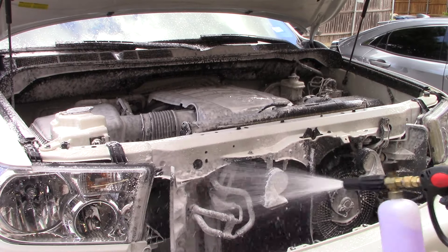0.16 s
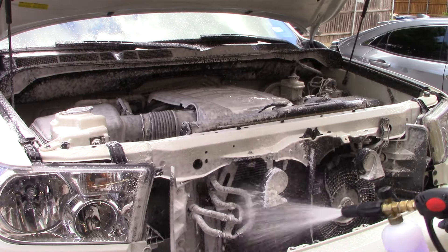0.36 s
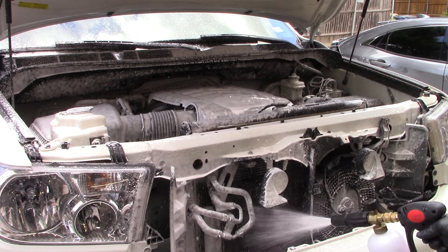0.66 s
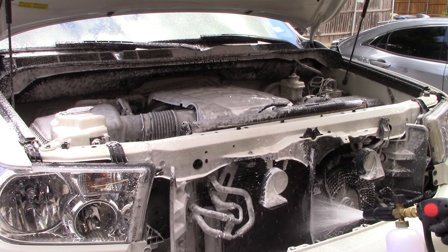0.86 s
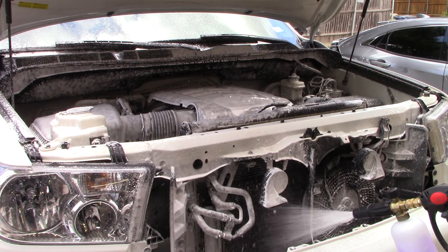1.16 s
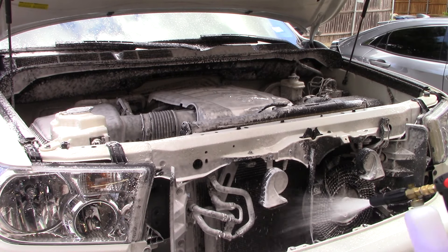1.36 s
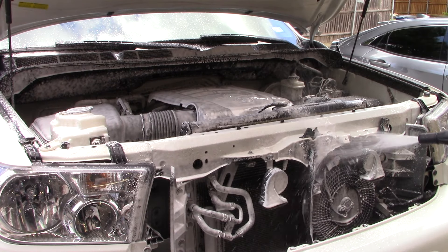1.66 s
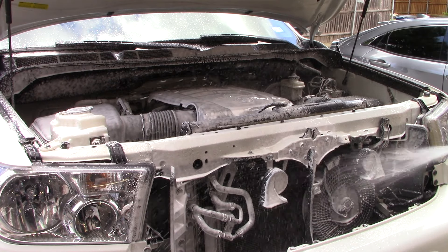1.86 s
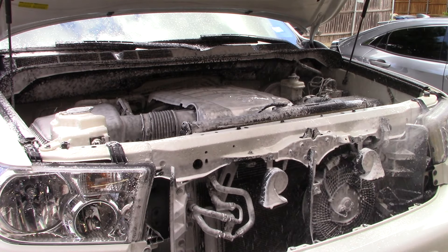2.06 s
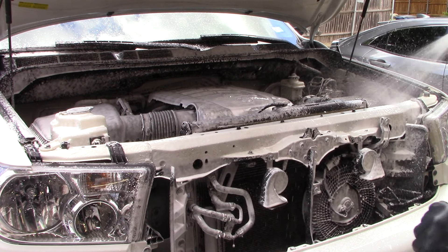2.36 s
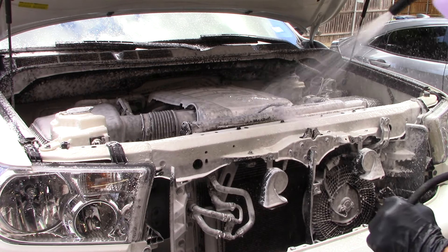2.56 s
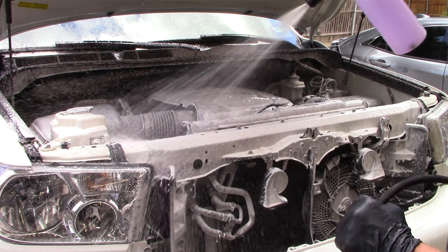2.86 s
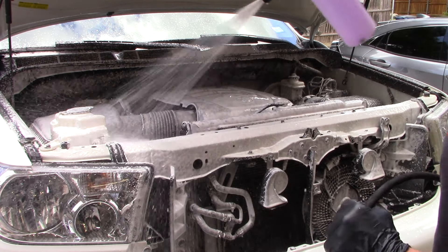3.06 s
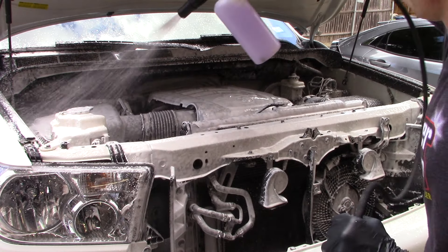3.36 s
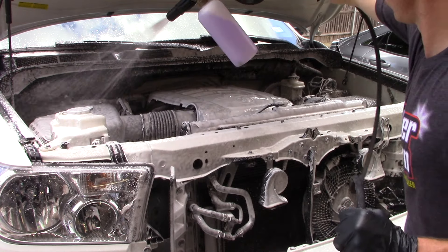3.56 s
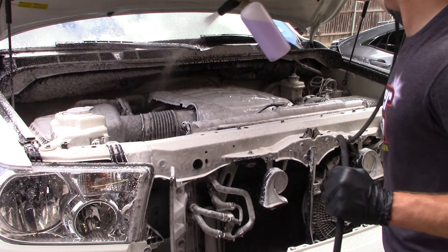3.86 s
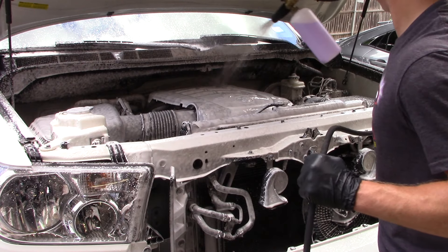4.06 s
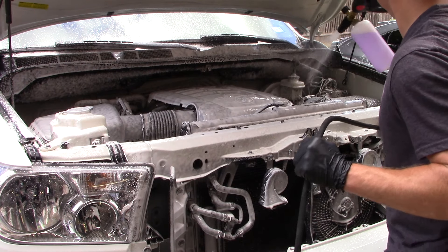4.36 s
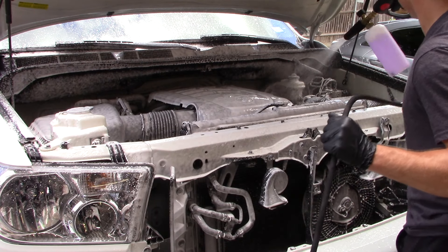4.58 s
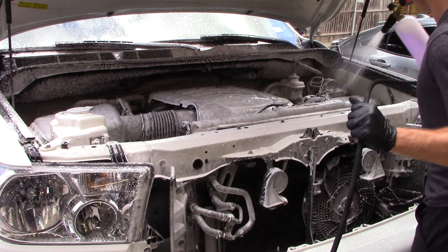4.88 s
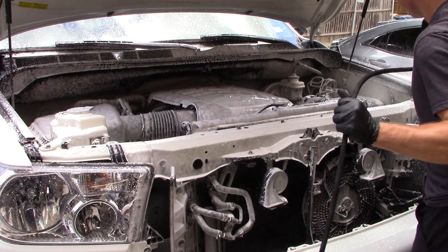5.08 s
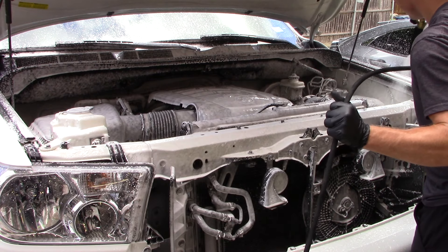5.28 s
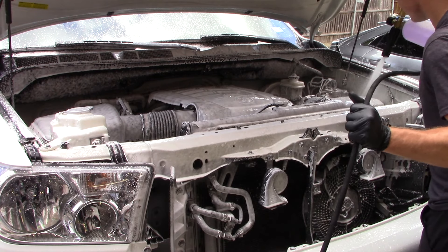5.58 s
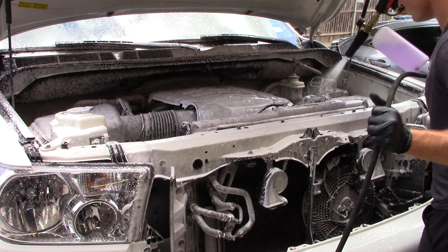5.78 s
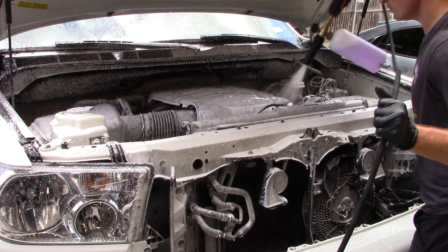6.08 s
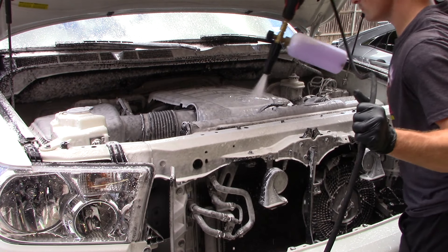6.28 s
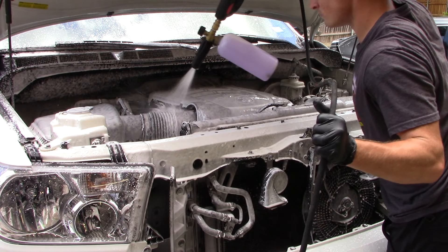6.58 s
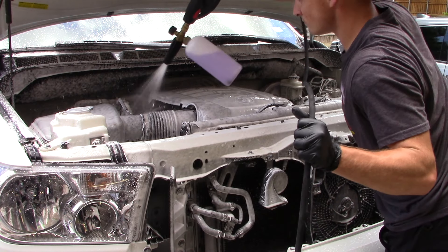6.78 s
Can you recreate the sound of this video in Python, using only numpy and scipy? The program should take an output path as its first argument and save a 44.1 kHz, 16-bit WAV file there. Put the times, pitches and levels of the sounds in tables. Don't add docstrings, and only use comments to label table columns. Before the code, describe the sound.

Loud continuous wet hiss and airy roar of a foam sprayer sweeping an open engine bay, with a motor pump droning steadily underneath.

```python
import sys
import numpy as np
from scipy import signal
from scipy.fft import rfft, irfft
from scipy.io import wavfile
from scipy.ndimage import uniform_filter1d, map_coordinates

SR = 44100
rng = np.random.default_rng(int(sys.argv[2]) if len(sys.argv) > 2 else 0)


def volts_from_db(level):
    exponent = np.asarray(level, float) / 20
    return 10 ** exponent


def transcribe(u):
    v = np.clip(np.atleast_2d(u).T, -1, 1)
    q = np.round(v * 32767).astype(np.int16)
    wavfile.write(sys.argv[1], SR, q)


N = 305613
HOP, SIZE = 128, 512

# t/s, splash level/dB, mist level/dB, splash centre f/Hz
SPRAY_PATH = [(0, -20.5, -23, 5800), (.6, -21.5, -29.5, 6250), (1.4, -20.5, -28.5, 6230),
              (1.7, -19, -26, 6260), (2.1, -19, -23, 6200), (2.5, -22, -23, 5370), (2.75, -20, -21, 5900),
              (3.3, -20, -26.5, 5370), (3.67, -22.5, -26.5, 5100), (4.2, -21.5, -23.5, 5170),
              (4.7, -22.5, -24, 5000), (5.15, -23.5, -24.5, 5470), (5.62, -21, -26, 5800),
              (5.85, -20.5, -24.5, 5300), (6.2, -17.5, -21.5, 5400), (6.55, -21, -25.5, 5500),
              (6.93, -21, -23.5, 5000)]
# t/s, swell level/dB, half length/s
MIST_GLINTS = [(.04, 0, 0.074), (.25, 5, 0.036), (.4, 1.5, .04), (.5, 6, 0.061), (.79, 5.5, 0.057),
               (.91, 4, 0.022), (1.01, 3, 0.045), (1.16, 3, 0.016), (1.3, 5, 0.039), (1.58, 5.5, 0.01),
               (1.69, 6, 0.091), (1.97, 4.5, .08), (2.26, 3, 0.032), (2.52, 2, .05), (3.03, 4.5, .06),
               (3.28, 4.5, 0.041), (3.42, 0.5, .05), (3.76, 2, .04), (3.97, 3.5, 0.18), (4.45, 1.5, 0.086),
               (4.8, 3, 0.12), (5.12, 2.5, 0.064), (5.4, 3, .11), (5.76, 2.5, .05), (6.0, 2, 0.036),
               (6.62, 4.5, 0.038), (6.77, 5, 0.082), (6.93, 1, .03)]


def unit(x):
    return x / np.sqrt(np.mean(np.abs(x) ** 2) + 1e-20)


def along(points, hz):
    f, v = np.transpose(points)
    return np.interp(np.log(hz + 1), np.log(f + 1), v, -120, -120)


def curves(rows, step=1):
    s, *cols = np.transpose(rows)
    now = np.arange(0, N + SIZE, step) / SR
    return [np.interp(now, s, c)[:N] for c in cols]


def swells(rows, step=1):
    coarse = np.arange(0, N + SIZE, 64) / SR
    total = sum(db * np.exp(-((coarse - s) / half_s) ** 2) for s, db, half_s in rows)
    return np.interp(np.arange(0, N + SIZE, step) / SR, coarse, total)[:N]


def wobble(rate):
    coarse = np.arange(0, N + 32, 32)
    knots = rng.standard_normal(int(N * rate / SR) + 4)
    return np.interp(np.arange(N), coarse, map_coordinates(knots, [coarse * rate / SR]))


def shaped(x, gain, patchy_db, patch_hz, patch_s):
    hz, t, z = signal.stft(x, SR, nperseg=SIZE, noverlap=SIZE - HOP)
    patches = rng.standard_normal(z.shape)
    for _ in range(2):
        patches = uniform_filter1d(patches, 1 + int(patch_hz * SIZE / SR), axis=0)
        patches = uniform_filter1d(patches, 1 + int(patch_s * SR / HOP), axis=1)
    z = z * gain(hz[:, None], len(t)) * volts_from_db(patchy_db * unit(patches))
    return unit(signal.istft(z, SR, nperseg=SIZE, noverlap=SIZE - HOP)[1][:N])


def noise_through(points, **patching):
    return shaped(rng.standard_normal(N), lambda hz, n: volts_from_db(along(points, hz)), **patching)


def resonance(centre, width_hz, skirt):
    return lambda hz, n: (1 + (2 * (hz - centre[:n]) / width_hz) ** 2) ** -skirt


def echoed(x, rate, level_db, drift_ms):
    # delay/ms, level/dB
    bounces = [(1.2, -10.5), (1.6, -9), (2.3, -10), (3.1, -5.5), (3.9, -10.5), (4.8, -12), (5.7, -9),
               (7.5, -7)]
    now = np.arange(N)
    total, power = x, 1
    for ms, db in bounces:
        gain = volts_from_db(db + level_db) * wobble(rate)
        delay = (ms + drift_ms * wobble(3)) * SR / 1000
        total = total + gain * map_coordinates(x, [now - delay], order=1, mode="wrap")
        power = power + gain ** 2
    return unit(total / np.sqrt(power))


def lance():
    # t/s, roar level/dB (nearness), chamber f/Hz,
    # upper resonance level/dB (side-on gain), upper f/Hz
    carried = [(0, -15, 2120, -17, 3750), (.35, -15, 2134, -13, 3700), (.65, -15, 2270, -12, 3730),
               (1.0, -14, 2240, -14.5, 3980), (1.3, -14, 2200, -18.5, 4050),
               (1.7, -15.5, 2220, -11.5, 4050), (2.1, -15, 2210, -13.5, 4100),
               (2.65, -14.5, 2103, -8, 4120), (3.0, -16, 2190, -5.5, 3920), (3.7, -15.5, 2154, -8, 4130),
               (4.05, -18, 2240, -6, 3870), (4.5, -18.5, 2230, -5, 4100), (4.85, -16, 2110, -12.5, 3970),
               (5.2, -18, 2270, -7, 3960), (5.75, -15.5, 2130, -6, 3980), (6.15, -15, 2180, -8.5, 3830),
               (6.5, -13.5, 2060, -9.5, 3940), (6.93, -14.5, 2210, -3.5, 3720)]
    # t/s, swell level/dB, half length/s
    gulps = [(.13, -2.5, .04), (.21, 3.5, .05), (.6, 3, 0.07), (.79, 4, 0.012), (1.05, 3.5, 0.054),
             (1.185, -4, 0.04), (1.42, -7, 0.022), (1.56, 5.5, 0.026), (2.14, 4, 0.025), (2.24, 1.5, .03),
             (2.7, 2, 0.066), (2.97, 3, .015), (3.11, 5, 0.027), (3.2, 5.5, 0.036), (3.32, 4, .03),
             (3.8, 2.5, 0.022), (4.19, 4.5, 0.06), (4.32, -1, 0.037), (5.31, -3, 0.022), (6.32, 3, 0.07),
             (6.43, -2, 0.018), (6.66, 1.5, 0.023), (6.87, 3, .03)]
    # t/s, upper swell level/dB, half length/s
    twists = [(.48, 3, .05), (1.33, 9.5, .05), (1.43, -1, .04), (1.61, 9, .04), (1.92, 4.5, .05),
              (2.16, 4, .04), (2.3, 2.5, 0.037), (2.39, -7, 0.083), (2.99, 1, .03), (3.19, 4.5, .08),
              (3.63, 3.5, .02), (3.71, 1, .03), (4.15, 2, .1), (4.52, -4, .03), (4.76, -6, 0.045),
              (5.6, 1, .1), (5.73, -4, 0.039), (5.82, 3, .05)]
    near_db, _, flank_db, _ = curves(carried)
    _, low_hz, _, high_hz = curves(carried, step=HOP)

    body = resonance(low_hz, width_hz=820, skirt=1.6)
    ridge = resonance(low_hz, width_hz=260, skirt=1.28)
    low = shaped(rng.standard_normal(N), lambda hz, n: body(hz, n) + .5 * ridge(hz, n),
                 patchy_db=0.94, patch_hz=150, patch_s=0.091)
    low = echoed(low, rate=5.5, level_db=-3, drift_ms=0.094)

    broad = resonance(high_hz, width_hz=930, skirt=1.23)
    core = resonance(high_hz, width_hz=530, skirt=0.53)

    def upper(hz, n):
        low_cut = 1 + (3550 / (hz + 1)) ** 12
        return (broad(hz, n) + 0.67 * core(hz, n)) / low_cut

    high = shaped(rng.standard_normal(N), upper, patchy_db=2.5, patch_hz=200, patch_s=0.07)
    high = echoed(high, rate=6, level_db=0.0, drift_ms=0.087)

    low_db = near_db + swells(gulps) + 0.38 * wobble(14)
    high_db = near_db + flank_db + swells(twists) + 1.04 * wobble(12)
    return volts_from_db(low_db - 0.5) * low + volts_from_db(high_db - 1.0) * high


def droplets(share, size_db):
    sizes = volts_from_db(size_db * np.minimum(rng.exponential(size=N), 3)) * (rng.random(N) < .03)
    drops = unit(sizes * rng.standard_normal(N))
    return np.sqrt(1 - share) * rng.standard_normal(N) + np.sqrt(share) * drops


def misty(hz, n):
    # f/Hz, level/dB
    mist_colour = [(5500, -14), (7500, -6.5), (8800, -1), (10400, 0), (12000, -3), (14000, -9.5),
                   (15800, -15)]
    # t/s, finest hiss level/dB, half length/s
    shades = [
        (3.6, -4, .2),
        (4.35, -4, .15),
        (4.7, -4.5, .15),
        (5.0, -5, .05),
        (5.63, -3.5, .1),
        (6.35, -2.5, .12),
        (2.95, -3, .3),
    ]
    mist_db = curves(SPRAY_PATH, step=HOP)[1]
    facing_db = -.3 * (mist_db + 23) - .6
    facing_db = facing_db + 0.25 * swells(MIST_GLINTS, step=HOP) + swells(shades, step=HOP)
    finest = np.clip((hz - 11000) / 3000, 0, 1.15)
    return volts_from_db(along(mist_colour, hz) + finest * facing_db[:n])


def spray():
    # f/Hz, level/dB
    splash_colour = [(2400, -24), (3500, -15), (4400, -1.5), (5200, 0), (6500, -1.5), (7800, 2),
                     (9000, -2.5), (11000, -10)]
    # f/Hz, level/dB
    panel_colour = [(2200, -6), (2700, 3.5), (3100, -2), (3500, -3), (4000, -7)]
    # t/s, swell level/dB, half length/s
    panel_hits = [(.35, 5.5, .07), (.92, 4.5, .05), (.99, -6, 0.043), (1.5, 2, .06), (1.66, 5, .04),
                  (2.01, 7, .025), (2.31, 4, .06), (3.03, 3, .05), (4.3, -3, 0.46), (4.8, 5.5, 0.14),
                  (.12, 3, 0.19), (6.7, 2.5, .06), (6.2, 2.5, .45)]
    splash_db, mist_db, _ = curves(SPRAY_PATH)
    centre_hz = curves(SPRAY_PATH, step=HOP)[-1]
    glint_db = swells(MIST_GLINTS)
    flutter = 0.22 * wobble(25) + 0.76 * wobble(90)

    wide = resonance(centre_hz, width_hz=2540, skirt=0.68)
    tight = resonance(centre_hz, width_hz=900, skirt=0.68)

    def aimed(hz, n):
        return volts_from_db(along(splash_colour, hz)) * (wide(hz, n) + 0.19 * tight(hz, n))

    splash = shaped(droplets(share=.06, size_db=3.0), aimed, patchy_db=1.56, patch_hz=400, patch_s=0.036)
    splash = echoed(splash, rate=13, level_db=-1.5, drift_ms=0.157)
    splash_db = splash_db + 0.37 * glint_db + 0.34 * wobble(11)

    mist = shaped(droplets(share=0.13, size_db=5.5), misty, patchy_db=0.0, patch_hz=900, patch_s=0.061)
    mist = echoed(mist, rate=12, level_db=-15, drift_ms=0.119)
    mist_db = mist_db + glint_db + 0.34 * wobble(13)

    panel = noise_through(panel_colour, patchy_db=1.6, patch_hz=300, patch_s=0.033)
    panel_db = -28.5 + swells(panel_hits) + 1.9 * wobble(8)

    wet = volts_from_db(splash_db + 0.26 + 0.71 * flutter) * splash + volts_from_db(mist_db + .9 + flutter) * mist
    return wet + volts_from_db(panel_db) * panel


def pump():
    # order [multiple of shaft speed], level/dB
    orders = [(1, -83), (2, -82), (3, -28.5), (4, -47), (5, -33.5), (6, -22), (7, -15.5), (8, -25),
              (9, -13), (10, 1.5), (11, -8), (12, -18.5), (13, -17.5), (14, -19.5), (15, -14), (16, -18),
              (17, -15.5), (18, -11), (19, -17), (20, -12), (21, -18.5), (22, -9), (23, -11), (24, -22),
              (25, -13.5), (26, -21.5), (27, -14.5), (28, -19.5), (29, -13.5), (30, -8)]
    # t/s, tenth order level/dB
    pump_path = [(0, -30), (1.0, -29.5), (1.7, -26.5), (2.1, -27), (2.9, -25.5), (3.8, -27.5), (4.46, -25),
                 (4.8, -26.5), (5.2, -24), (5.9, -25.5), (6.18, -24.5), (6.5, -26.5), (6.93, -27)]
    # f/Hz, rms level/dB
    mains = [(120, -84), (240, -66), (360, -56.5)]
    # f/Hz, level/dB
    housing_colour = [(150, -51), (250, -40), (350, -15), (430, -9.5), (500, 4), (570, -2.5), (700, -10.5),
                      (1000, -37)]
    # f/Hz, level/dB
    bay_colour = [(100, -66), (300, -21), (600, -6.5), (900, -4.5), (1300, 0), (1600, -1), (2000, 6.5),
                  (2600, -8.5)]
    # t/s, swell level/dB, half length/s
    rattles = [
        (.9, 6.5, .4),
        (1.45, 3, .2),
        (1.9, 3, .12),
        (2.5, -5.5, 0.27),
        (2.9, 3, 0.13),
        (5.7, 1.5, 0.27),
        (6.18, 3, 0.17),
    ]
    # t/s, swell level/dB, half length/s
    booms = [
        (1.7, 4.5, .06),
        (3.2, 3, .06),
        (4.03, 3, .1),
        (4.8, 3, 0.11),
        (5.13, 4, .08),
        (5.7, 1.5, 0.24),
        (6.18, 2.5, 0.22),
        (.9, -1, .4),
    ]
    shaft_hz = 56.71
    now = np.arange(N) / SR
    tone_db, = curves(pump_path)
    angle = 2 * np.pi * shaft_hz * now + 0.022 * wobble(4)
    hum = np.zeros(N)
    for k, db in orders:
        follow = np.exp(-(k - 10) ** 2)
        level_db = db + follow * (tone_db + 27.5) + 0.45 * wobble(2.84)
        hum += volts_from_db(level_db - 24.5) * np.sin(k * angle + rng.uniform(0, 2 * np.pi))
    for hz, db in mains:
        hum += volts_from_db(db + 1.5) * np.sin(2 * np.pi * hz * now)

    housing = noise_through(housing_colour, patchy_db=1.3, patch_hz=150, patch_s=0.52)
    housing_db = -37 + swells(rattles) + 1.8 * wobble(6)
    bay = noise_through(bay_colour, patchy_db=2.0, patch_hz=250, patch_s=0.046)
    path_swing_db = tone_db - tone_db.mean()
    bay_db = -27 + 0.23 * path_swing_db + swells(booms) + 0.93 * wobble(5.6)
    return hum + volts_from_db(housing_db) * housing + volts_from_db(bay_db) * bay


def side_flecks():
    # t/s, low edge f/Hz, high edge f/Hz, level/dB
    flecks = [
        (2.12, 6250, 9000, -22),
        (2.306, 6250, 7500, -26),
        (2.795, 4600, 5750, -27),
        (3.42, 5130, 6900, -26),
        (4.35, 13000, 15800, -39),
        (5.859, 13400, 15200, -44),
        (6.765, 9700, 13100, -22),
    ]
    side = np.zeros(N + 2048)
    fade = signal.windows.tukey(1500, .7)
    size = len(fade)
    hz = np.fft.rfftfreq(size, 1 / SR)
    for s, low_hz, high_hz, db in flecks:
        inside = (hz > low_hz) * (hz < high_hz)
        band = irfft(rfft(rng.standard_normal(size)) * inside, size)
        start = round(s * SR) - size // 2
        side[start:start + size] += volts_from_db(db) * fade * unit(band)
    return side[:N] * [[1], [-1]]


def scene():
    return np.tile(lance() + spray() + pump(), (2, 1))


def band_limit(x):
    return signal.sosfilt(signal.butter(12, 15830, fs=SR, output="sos"), x)


def record(dry):
    ceiling, knee = .87, 7
    hz = np.fft.rfftfreq(N, 1 / SR)
    bass_cut = 1 / np.sqrt(1 + (130 / (hz + 1)) ** 6)
    x = irfft(rfft(dry) * bass_cut, N)
    x = x / (1 + np.abs(x / ceiling) ** knee) ** (1 / knee)
    x = irfft(rfft(x + side_flecks()) * (hz < 15800), N)
    return band_limit(x)


dry = scene()
out = record(dry)
transcribe(out)
```